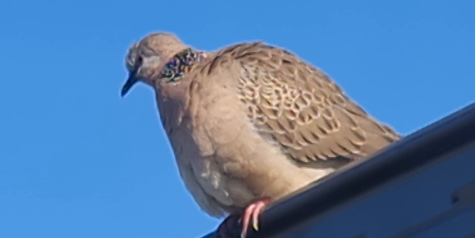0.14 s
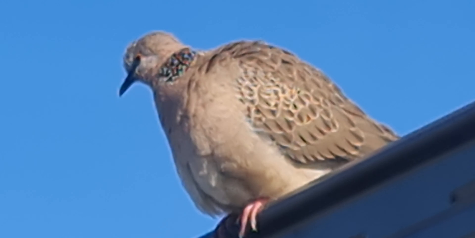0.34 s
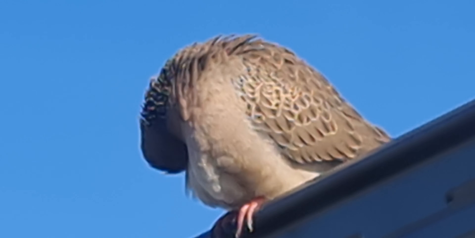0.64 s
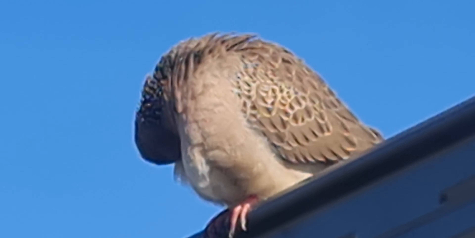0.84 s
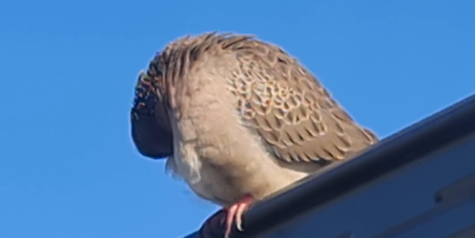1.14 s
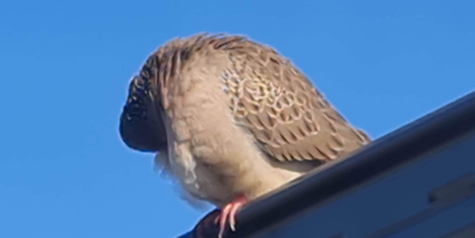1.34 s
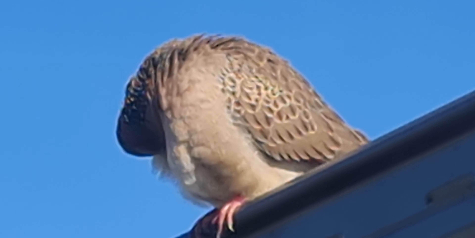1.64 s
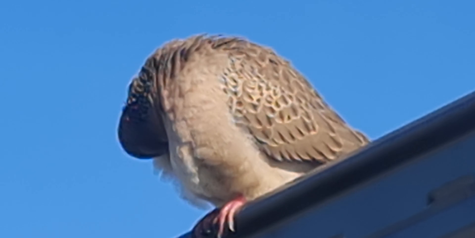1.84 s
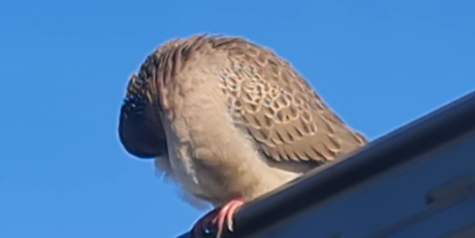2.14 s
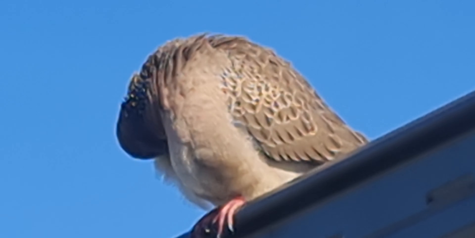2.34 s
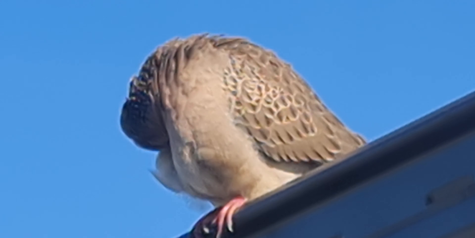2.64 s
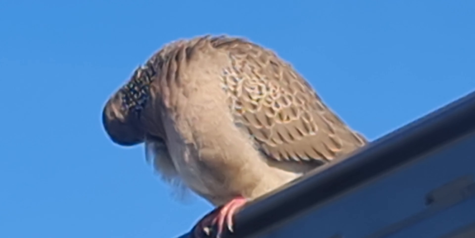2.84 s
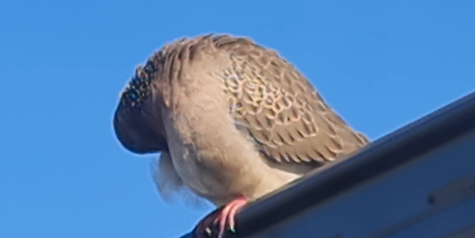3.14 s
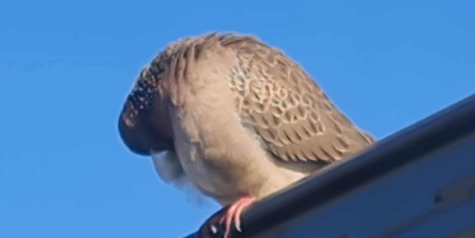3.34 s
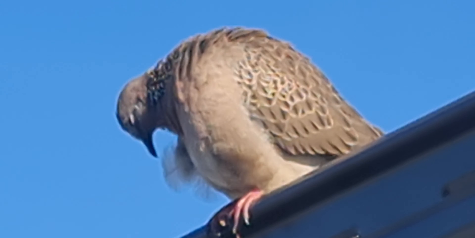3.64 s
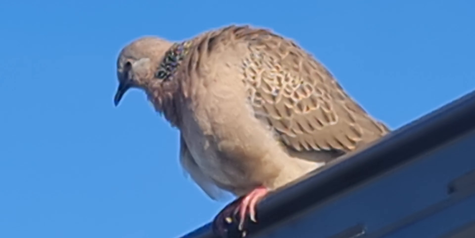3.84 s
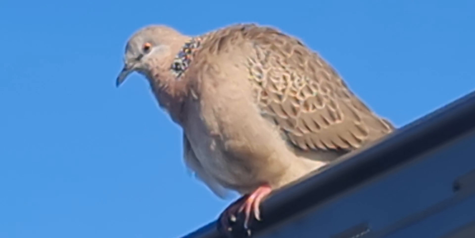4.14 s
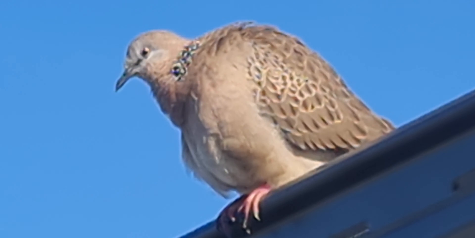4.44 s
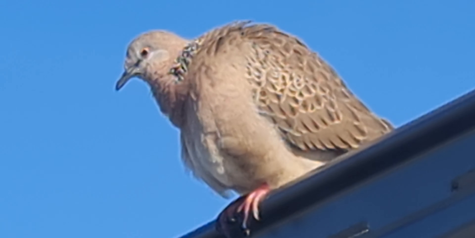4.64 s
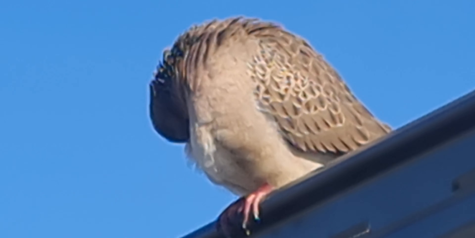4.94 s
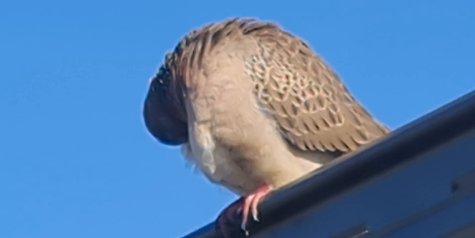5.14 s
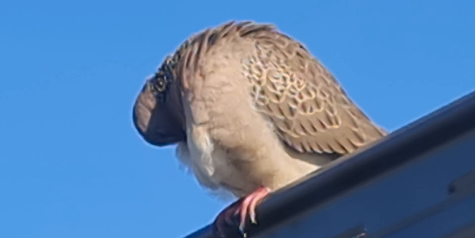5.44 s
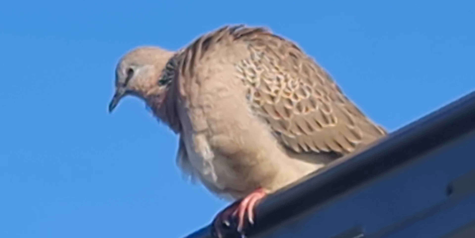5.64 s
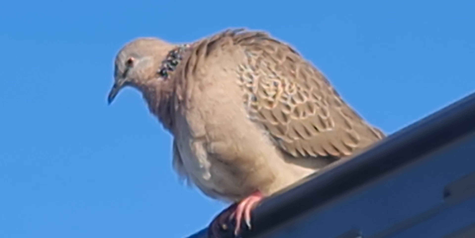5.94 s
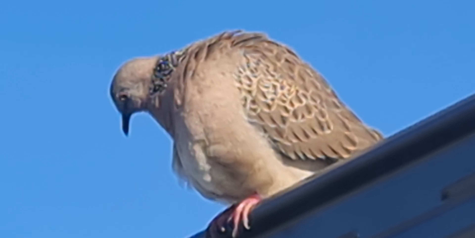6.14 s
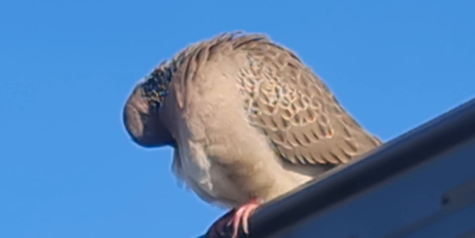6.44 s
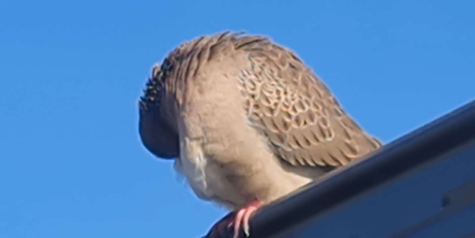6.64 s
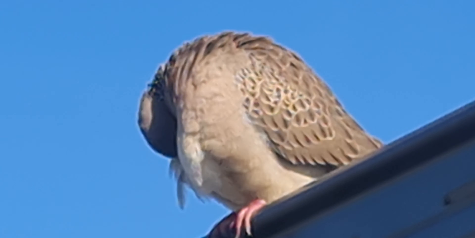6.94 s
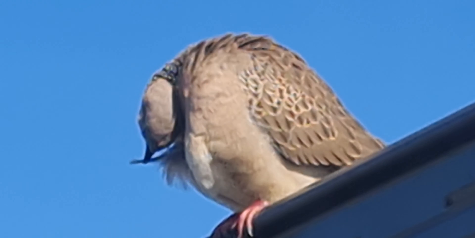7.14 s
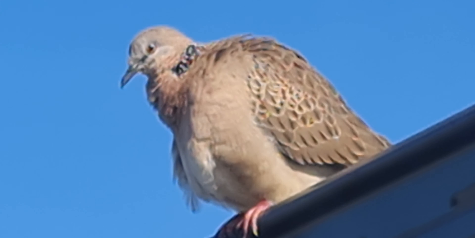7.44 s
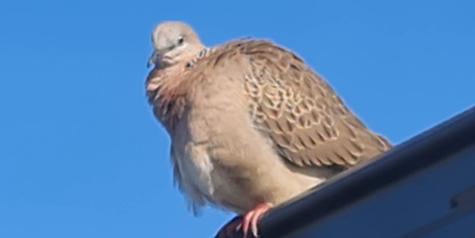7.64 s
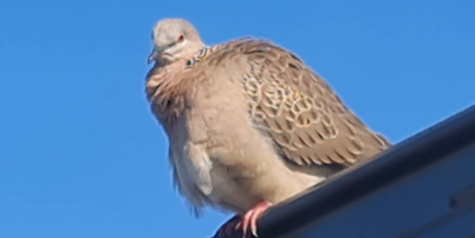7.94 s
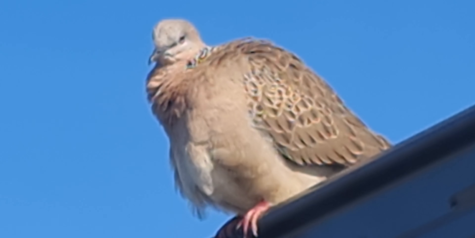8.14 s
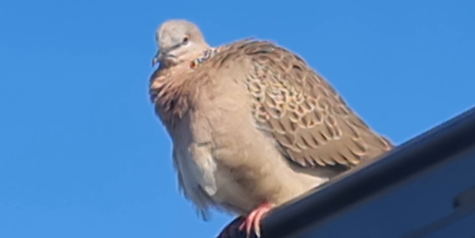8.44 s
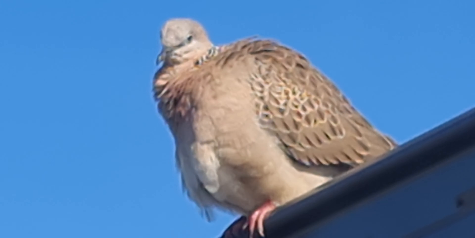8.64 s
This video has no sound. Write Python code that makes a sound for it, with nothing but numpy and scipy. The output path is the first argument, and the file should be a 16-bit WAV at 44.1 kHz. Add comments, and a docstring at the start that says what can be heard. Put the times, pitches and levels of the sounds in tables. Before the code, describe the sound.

Outdoors near a house, a dove finishes a long purring coo, then after a pause gives two full phrases: short coo, swelling coo, sinking purr. Between them small birds chip, whistle, scold harshly and fall in husky slurs; a quickening twitter follows before another phrase begins and is cut off. Dove prominent with light echo, mono, over soft hush and faint rumble.

```python
"""A spotted dove on a roof gutter is heard first at the end of a phrase, on a long purring coo.
Faint high tones sound along with it; small birds chip and whistle, and a ping and a faint hoot come next.
The next phrase runs short coo, swelling arched coo, purr: a near sine chopped by a trill, echoed by the house.
Scolds and husky falls follow, then the phrase again, a quickening twitter and the start of one more phrase.
High calls are frequency-modulated sines; shaped noise gives a far rumble and a soft hush throughout."""
import sys
import numpy as np
from scipy import signal
from scipy.fft import rfft, irfft
from scipy.io import wavfile

SR = 44100
rng = np.random.default_rng(int(sys.argv[2]) if len(sys.argv) > 2 else 0)


def wav_record(signal):
    """Record a signal, one row per channel, as 16-bit PCM in the file named by sys.argv[1]."""
    frames = np.transpose(np.atleast_2d(signal))
    bounded = np.clip(frames, -1, 1)
    # unit amplitude maps onto the largest positive 16-bit level
    quanta = np.round(bounded * 32767).astype(np.int16)
    wavfile.write(sys.argv[1], SR, quanta)


N = 387638  # length in samples

# The opening coo. Each row: start in seconds, length in seconds, pitch in Hz before scoop and sag,
# level in dB before shaping.
SHORT_COOS = [(2.807, 0.11, 641, -11.5), (5.332, 0.11, 649, -11), (8.357, 0.11, 643, -11)]
# The swelling coo. Each row: start in seconds, length in seconds, pitch the climb aims for in Hz,
# level in dB before shaping.
ARCHED_COOS = [(2.942, 0.24, 741.7, -6), (5.47, .248, 735, -5.5), (8.499, .243, 742, -5.5)]
# The long closing coo. Each row: start in seconds, length in seconds, pitch in Hz before scoop and sag,
# level in dB before shaping.
PURRING_COOS = [(0.037, .617, 706.2, -6.5), (3.33, .6, 702.8, -6), (5.855, .58, 692.8, -6)]
# Discrete reflections off roof and walls. Each row: delay in seconds, level in dB re the direct voice.
HOUSE_ECHOES = [(.0105, -19.5), (.024, -13), (.041, -17), (.075, -20.5), (.14, -26)]
GARDEN_DB, GARDEN_T60_S = -16.5, 1.15


def dove():
    """Reverberation: direct voice, early echoes off the house, then diffuse tails from garden and street."""
    voice = repeat(short_coo, SHORT_COOS)
    voice += repeat(arched_coo, ARCHED_COOS)
    voice += repeat(purring_coo, PURRING_COOS)
    out = voice + from_db(GARDEN_DB) * scatter(voice, t60=GARDEN_T60_S, delay=0.013)
    out += from_db(-26.5) * scatter(voice, t60=4.0, delay=0.19)  # the street
    for delay, echo_db in HOUSE_ECHOES:
        add(out, delay, from_db(echo_db) * voice)
    # the tail stops dead at the last tick and stays silent until the next short coo
    silent_from = int(TICKS[-1][0] * SR)
    silent_to = int(SHORT_COOS[1][0] * SR)
    out[silent_from:silent_to] = 0
    return out


SCOOP_S, COO_RELEASE_S = 0.01532, 0.015
SHORT_SCOOP_HZ, SHORT_SAG_HZ, SHORT_ATTACK_S = 228, 172, 0.022
SHORT_HOLD_S, SHORT_BREAK_S, SHORT_BREAK_DB = 0.054, 0.024, 5.5
SHORT_TRILL, SHORT_BROKEN_TRILL, SHORT_PULSES_PER_S = 0.3, 0.7, 78  # trill depths 0-1


def short_coo(length, pitch_hz):
    """Pitch glide and amplitude modulation: scoops up, holds almost clear, sags and breaks into a weak trill."""
    t, u = clock(length)
    hz = pitch_hz - SHORT_SCOOP_HZ * np.exp(-t / SCOOP_S) - SHORT_SAG_HZ * u ** 2
    broken = ramp((t - SHORT_HOLD_S) / SHORT_BREAK_S)
    gain = envelope(t, SHORT_ATTACK_S, COO_RELEASE_S) * from_db(-SHORT_BREAK_DB * broken)
    depth = SHORT_TRILL * (1 - broken) + SHORT_BROKEN_TRILL * broken
    return coo(hz, gain, depth, SHORT_PULSES_PER_S)


ARCH_FROM_HZ, ARCH_CLIMB_AT_S, ARCH_CLIMB_S = 535, 0.112, 0.015
ARCH_SWELL_S, ARCH_SWELL_DB, ARCH_DROP_HZ, ARCH_DROP_S = 0.135, 21, 280, 0.014
ARCH_TRILL, ARCH_CLEARS_AT_S, ARCH_CLEARS_S, ARCH_PULSES_PER_S = 0.8, 0.1, 0.054, 76
RESONANCE_HZ, RESONANCE_WIDTH_HZ, RESONANCE_DB = 688, 30, 4


def arched_coo(length, top_hz, release_s=0.021):
    """Resonance: a swelling trill climbs to a clear tone and collapses, flaring at each pass of a resonance."""
    t, _ = clock(length)
    effort = 1 / (1 + np.exp((ARCH_CLIMB_AT_S - t) / ARCH_CLIMB_S))
    climb_hz = ARCH_FROM_HZ + (top_hz - ARCH_FROM_HZ) * effort
    hz = climb_hz - ARCH_DROP_HZ * np.exp((t - length) / ARCH_DROP_S)
    swell_db = -ARCH_SWELL_DB * np.maximum(1 - t / ARCH_SWELL_S, 0) ** 1.24
    flare_db = RESONANCE_DB * np.exp(-((hz - RESONANCE_HZ) / RESONANCE_WIDTH_HZ) ** 2)
    gain = envelope(t, 0.005, release_s) * from_db(swell_db + flare_db)
    depth = ARCH_TRILL * (1 - ramp((t - ARCH_CLEARS_AT_S) / ARCH_CLEARS_S))
    return coo(hz, gain, depth, ARCH_PULSES_PER_S)


PURR_SCOOP_HZ, PURR_SAG_HZ, PURR_DROP_HZ, PURR_DROP_S = 215.6, 153.5, 114, 0.0097
PURR_ATTACK_S, PURR_FADE_DB = 0.055, 5.5
PURR_TRILL, PURR_CLEARS_S = 0.86, 0.29
PURR_PULSES_PER_S, PURR_QUICKENS_PER_S = 45, 18  # the quickening is scaled by the trill depth


def purring_coo(length, pitch_hz, scoop_s=0.02):
    """Amplitude modulation: a deep trill, quickest near the middle, that sinks in pitch and smooths out."""
    t, u = clock(length)
    hz = pitch_hz - PURR_SCOOP_HZ * np.exp(-t / scoop_s) - PURR_SAG_HZ * u ** 1.8
    hz -= PURR_DROP_HZ * np.exp((t - length) / PURR_DROP_S)
    gain = envelope(t, PURR_ATTACK_S, COO_RELEASE_S) * from_db(-PURR_FADE_DB * u ** 2)
    depth = PURR_TRILL * ramp((length - t) / PURR_CLEARS_S)
    rate = PURR_PULSES_PER_S + PURR_QUICKENS_PER_S * np.sin(np.pi * u) * depth
    return coo(hz, gain, depth, rate)


PULSE_FLUTTER_DB, PULSE_UNEVEN, STUMBLE = 1.5, 0.26, 0.2  # last two: spread as a fraction


def coo(hz, gain, depth, rate, sag=0.19, lift=0.067, jitter=0.017, second_db=-41, third_db=-47):
    """Flow modulation: a valve chops a near sine into pulses, and pitch sags as the flow is pinched."""
    size, depth = len(hz), np.clip(depth, 0, 1)
    cycle = turns_of(rate * (1 + PULSE_UNEVEN * wander(35, size)))
    pinch = depth * np.abs(np.sin(cycle / 2)) ** 2.5
    # the pitch climbs through each pulse, and the tone stumbles out of step between pulses
    bend = lift * depth * np.sin(cycle)
    bend -= pinch ** 2 * (sag + STUMBLE * wander(57.6, size))
    phase = turns_of(hz * (1 + bend + jitter * wander(220, size)))
    flutter = from_db(PULSE_FLUTTER_DB * depth * wander(75, size))
    flow = (1 - pinch) * gain * flutter
    # the swollen throat passes little but the fundamental
    throat = signal.butter(3, [420, 840], "band", fs=SR, output="sos")
    fundamental = signal.sosfilt(throat, flow * np.sin(phase))
    overtones = from_db(second_db) * np.sin(2 * phase) + from_db(third_db) * np.sin(3 * phase)
    return fundamental + flow * overtones


# Clear thin whistles; the first two are faint high tones heard along with the opening coo.
# Each row: start in seconds, length in seconds, first pitch in Hz, last pitch in Hz,
# level in dB before the distance mix.
WHISTLES = [(.04, .15, 4950, 5270, -53), (.29, .32, 5300, 5260, -58), (.85, 0.174, 4250, 4250, -52.5),
            (1.33, .14, 1747, 2117, -52), (1.47, 0.14, 2210, 2176, -53.5), (1.74, .1, 1826, 1727, -47.5),
            (5.6, 0.28, 2310, 1934, -54.5), (6.19, 0.13, 2105, 1935, -42.5), (6.2, 1, 2483, 2504, -51),
            (6.62, 0.078, 2186, 2120, -43), (6.73, 0.092, 2074, 1907, -44), (7.14, .25, 2062, 2130, -50),
            (7.49, 0.2, 2090, 2300, -47), (7.5, 0.46, 2827, 2607, -46.5), (8.24, 0.43, 3215, 3170, -51.5),
            (8.54, .23, 4760, 5020, -50)]
# Mellow whistles that jump up and slide down. Each row: start in seconds, length in seconds,
# level in dB before the distance mix.
DOWNSLURS = [(0.455, .43, -42.5), (1.963, .36, -43)]
# Whistles that climb. Each row: start in seconds, length in seconds, level in dB before the distance mix.
UPSLURS = [(2.376, 0.11, -33), (3.179, 0.12, -33), (3.86, 0.14, -31.5)]
# Harsh scolding calls. Each row: start in seconds, length in seconds, first pitch in Hz,
# last pitch in Hz, level in dB before the distance mix.
SCOLDS = [(4.065, 0.083, 4800, 5170, -46), (4.11, 0.34, 3310, 3317, -38), (4.37, .26, 3380, 3400, -37.5),
          (5.95, 0.38, 3960, 3857, -50.5), (7.64, .2, 3286, 3110, -40), (7.92, 0.24, 6220, 6100, -50),
          (7.97, 0.17, 3450, 3800, -42.5), (8.2, 0.39, 3703, 3554, -42), (8.5, 0.28, 5670, 5600, -51.5)]
# Husky falling calls. Each row: start in seconds, length in seconds, first pitch in Hz,
# last pitch in Hz, level in dB before the distance mix.
FALLS = [(4.55, .18, 3946, 2766, -34.5), (4.88, .32, 5030, 2720, -36)]
WHISTLE_RASP, SCOLD_RASP = 0.16, 0.94  # 0-1


def small_birds():
    """Direct-to-reverberant ratio: close chips are mostly direct; near and far calls carry more scattered
    sound, near with the longer tail."""
    close = chips()
    near = glides(SCOLDS, SCOLD_RASP, quiver_db=3.0)
    near += glides(FALLS, rasp=0.73, quiver_db=2.5)
    near += twitters()
    far = glides(WHISTLES, WHISTLE_RASP)
    far += repeat(downslur, DOWNSLURS)
    far += repeat(upslur, UPSLURS)
    out = close + from_db(-1.5) * scatter(close, t60=0.48, delay=0.0062)
    out += from_db(-1.5) * near + scatter(near, t60=1.0, delay=0.0048)
    out += from_db(-2.5) * far + from_db(-1.0) * scatter(far, t60=0.78, delay=0.005)
    return out


# The notes of one chip. Each row: delay from the chip's onset in seconds, length in seconds,
# first pitch in Hz, last pitch in Hz, level in dB before the chip's own level is added, rasp 0-1.
CHIP_NOTES = [(-.025, .028, 4500, 6360, -38.5, 0.9), (0, .044, 4170, 3710, -26.5, 0.2),
              (0.044, .022, 2970, 3800, -29.5, 0.18), (0.06, .04, 3750, 2603, -34.5, .3)]
# When chips sound. Each row: onset in seconds, level in dB added to every note.
CHIPS = [(.67, 2), (1.594, -6.5)]


def chips():
    """Frequency modulation: a very harsh upstroke, two clearer notes and a slightly rough fall."""
    out = np.zeros(N)
    for delay, length, first_hz, last_hz, note_db, rasp in CHIP_NOTES:
        calls = [(s + delay, length, first_hz, last_hz, db + note_db) for s, db in CHIPS]
        out += glides(calls, rasp, quiver_db=-1.0, overtone_db=-28.5)
    return out


TWITTER_FROM_S, TWITTER_GAP_S, TWITTER_QUICKENS_S, TWITTER_LENGTH_S = 6.33, 0.107, 0.00051, 0.045
TWITTER_LOW_HZ, TWITTER_HIGH_HZ, TWITTER_DB, TWITTER_GROWS_DB = 3296, 4050, -49, 0.5


def twitters(count=12):
    """Accelerating rhythm: short upward flicks, each a little sooner and louder than the last."""
    calls = []
    for k in range(count):
        start = TWITTER_FROM_S + k * (TWITTER_GAP_S - k * TWITTER_QUICKENS_S)
        level_db = TWITTER_DB + k * TWITTER_GROWS_DB
        calls.append((start, TWITTER_LENGTH_S, TWITTER_LOW_HZ, TWITTER_HIGH_HZ, level_db))
    return glides(calls, rasp=0.6)


UPSLUR_LOW_HZ, UPSLUR_HIGH_HZ, UPSLUR_EDGE_DB, UPSLUR_RASP = 2920, 4370, 13.5, 0.13


def upslur(length):
    """Frequency sweep: a quickening climb in pitch, loudest past the middle."""
    u = clock(length)[1] ** 1.4
    hz = UPSLUR_LOW_HZ + (UPSLUR_HIGH_HZ - UPSLUR_LOW_HZ) * u
    return whistle(hz, from_db(-UPSLUR_EDGE_DB * np.abs(2 * u - 1)), UPSLUR_RASP)


DOWNSLUR_HZ, DOWNSLUR_JUMP_HZ, DOWNSLUR_JUMP_S = 3170, 1104, 0.045
DOWNSLUR_SLIDE_HZ, DOWNSLUR_RASP = 1121, 0.22


def downslur(length):
    """Frequency sweep: a quick exponential jump in pitch and a long linear slide down."""
    t, u = clock(length)
    hz = DOWNSLUR_HZ - DOWNSLUR_JUMP_HZ * np.exp(-t / DOWNSLUR_JUMP_S) - DOWNSLUR_SLIDE_HZ * u
    return whistle(hz, envelope(t, attack_s=0.032, release_s=0.031), DOWNSLUR_RASP)


def glides(calls, rasp, quiver_db=5.0, overtone_db=-36):
    """Glissando: calls swell and fade, quivering in level, while pitch slides by equal ratios."""
    out = np.zeros(N)
    for start, length, first_hz, last_hz, level_db in calls:
        _, u = clock(length)
        hz = first_hz * (last_hz / first_hz) ** u
        swell = np.sqrt(np.abs(np.sin(np.pi * u)))
        gain = swell * from_db(level_db + quiver_db * wander(50, len(u)))
        add(out, start, whistle(hz, gain, rasp, overtone_db=overtone_db))
    return out


def whistle(hz, gain, rasp, spread=0.131, rasp_hz=600, overtone_db=-36):
    """Frequency modulation: fast irregular swings of pitch make a tone harsh."""
    phase = turns_of(hz * (1 + spread * rasp * wander(rasp_hz, len(hz))))
    return gain * (np.sin(phase) + from_db(overtone_db) * np.sin(2 * phase))


# Partials of the bell-like ping. Each row: settled frequency in Hz, level in dB re PING_DB,
# decay time T60 in seconds.
PING_MODES = [(5070, -26, 0.57), (5147, 1.5, 0.26), (5290, -16.5, 0.4)]
PING_S, PING_DB, PING_HOLD_S = 2.378, -27, 0.031  # each partial holds before it dies
PING_BEND_HZ, PING_SETTLE_S = 218, 0.018  # it starts sharp and settles


def ping(shimmer=0.0086):
    """Modal decay: close partials start at once, settle in pitch and die away among the trees."""
    out = np.zeros(N)
    t, _ = clock(1)
    for hz, level_db, t60 in PING_MODES:
        pitch = hz * (1 + shimmer * wander(150, len(t))) + PING_BEND_HZ * np.exp(-t / PING_SETTLE_S)
        decay_db = -60 * np.maximum(t - PING_HOLD_S, 0) / t60
        add(out, PING_S, from_db(PING_DB + level_db + decay_db) * np.sin(turns_of(pitch)))
    return out + from_db(-10.5) * scatter(out, t60=1.0, delay=0.015)


HOOT_S, HOOT_LENGTH_S, HOOT_HZ, HOOT_DB = 2.46, 0.62, 319, -42.5


def hoot():
    """Steady tone: one faint low hoot far away, its pitch slightly unsteady."""
    out = np.zeros(N)
    t, _ = clock(HOOT_LENGTH_S)
    gain = from_db(HOOT_DB) * envelope(t, attack_s=0.051, release_s=0.053)
    add(out, HOOT_S, whistle(np.full(len(t), HOOT_HZ), gain, rasp=0.16))
    return out


# Faint dry ticks. Each row: start in seconds, level in dB.
TICKS = [(2.378, -32), (4.07, -31)]


def ticks(decay_s=0.00038):
    """Impulse: a burst of noise under a very short exponential decay."""
    out = np.zeros(N)
    t, _ = clock(1)
    for start, level_db in TICKS:
        add(out, start, from_db(level_db) * rng.standard_normal(SR) * np.exp(-t / decay_s))
    return out


# Spectrum of the low rumble. Each row: frequency in Hz, relative density in dB per Hz.
RUMBLE = [(12, -39), (20, -9), (60, -3), (73, 5), (88, -2), (125, -4), (150, -3), (182, -11.5), (216, -8),
          (274, -18.5), (300, -13.5), (390, -46), (660, -120)]
# Course of the rumble. Each row: time in seconds, level in dB before RUMBLE_DB is added.
RUMBLE_LEVEL = [(0.0, -39.5), (0.49, -42.5), (0.54, -37), (0.95, -44), (3.35, -40.5), (3.97, -34),
                (4.13, -46), (5.24, -46.5), (5.29, -40), (7.83, -46), (8.27, -39.5), (8.79, -40)]
# Spectrum of the outdoor hush. Each row: frequency in Hz, relative density in dB per Hz.
HUSH = [(150, -10), (280, -3), (450, -3), (700, 0), (950, 2), (1300, -7), (1800, -15), (2600, -19),
        (3700, -20), (5000, -24.5), (6500, -28), (8500, -32.5), (10500, -33), (11200, -47.5)]
# Course of the hush. Each row: time in seconds, level in dB before HUSH_DB is added.
HUSH_LEVEL = [(0.0, -42), (1.08, -44.5), (1.49, -43.5), (3.84, -44.5), (4.21, -45.5), (8.49, -44.5),
              (8.79, -41)]
RUMBLE_DB, HUSH_DB = 1.5, 5


def background():
    """Stationary noise with varying gain: low rumble and outdoor hush, with the hoot and ticks added."""
    t = np.arange(N) / SR
    rumble_db = np.interp(t, *np.transpose(RUMBLE_LEVEL)) + RUMBLE_DB
    hush_db = np.interp(t, *np.transpose(HUSH_LEVEL)) + HUSH_DB
    out = from_db(rumble_db) * coloured_noise(RUMBLE)
    out += from_db(hush_db) * coloured_noise(HUSH)
    return out + hoot() + ticks()


def coloured_noise(spectrum):
    """Spectral shaping: white noise weighted along a log frequency axis, then scaled to rms 1."""
    hz, db = np.transpose(spectrum)
    bins = np.maximum(np.fft.rfftfreq(N, 1 / SR), 1)
    gain = from_db(np.interp(np.log(bins), np.log(hz), db))
    return rms_one(irfft(rfft(rng.standard_normal(N)) * gain, N))


def scatter(x, t60, delay):
    """Diffuse reverberation: decaying noise of unit energy stands for echoes from walls and foliage."""
    t = np.arange(2 * SR) / SR
    onset = np.clip(t / delay - 1, 0, 1)
    response = rng.standard_normal(len(t)) * from_db(-60 * t / t60) * onset
    return signal.fftconvolve(x, response / np.linalg.norm(response))[:N]


def repeat(voice, events):
    """Superposition: one syllable per row, onset first, level last, its own settings between."""
    out = np.zeros(N)
    for start, *settings, level_db in events:
        add(out, start, from_db(level_db) * voice(*settings))
    return out


def add(out, start, sound):
    """Superposition: mix a sound in at a time in seconds."""
    at = int(np.clip(round(start * SR), 0, N - 1))
    out[at:at + len(sound)] += sound[:N - at]


def wander(rate_hz, size):
    """Low-pass random process: a smooth curve of rms 1, looped if the sound outlasts it."""
    smooth = signal.butter(2, rate_hz, fs=SR, output="sos")
    slow = signal.sosfilt(smooth, rng.standard_normal(2 * SR))
    return np.resize(rms_one(slow[SR // 2:]), size)


def turns_of(hz):
    """Phase as the integral of frequency, in radians."""
    return 2 * np.pi * np.cumsum(hz) / SR


def clock(length):
    """Time base: time from the onset in s, and the share of the length gone by."""
    t = np.arange(int(length * SR)) / SR
    return t, t / length


def ramp(x):
    """Raised-cosine step from 0 to 1 as x goes from 0 to 1."""
    return np.sin(np.pi / 2 * np.clip(x, 0, 1)) ** 2


def envelope(t, attack_s, release_s):
    """Amplitude envelope: attack, hold, release."""
    return np.sqrt(ramp(t / attack_s)) * ramp((t[-1] - t) / release_s)


def from_db(db):
    """Decibel law: amplitude ratio for a level in dB."""
    return 10 ** (np.asarray(db) / 20)


def rms_one(x):
    """Normalization to unit mean square."""
    return x / np.sqrt(np.mean(x ** 2) + 1e-20)


def steep(x, hz, kind):
    """Elliptic filtering: a steep low-pass or high-pass."""
    return signal.sosfilt(signal.ellip(10, 0.2, 70, hz, kind, fs=SR, output="sos"), x)


def scene():
    """Superposition of dove, small birds, ping and background in one channel."""
    return (dove() + small_birds() + ping() + background())[None]


DULL_ABOVE_HZ, DULL_DB, CUTOFF_HZ = 8700, -11, 15700


def record(dry):
    """Band limiting: the high treble is dulled and the top is cut steeply."""
    treble = steep(dry, DULL_ABOVE_HZ, "high")
    dulled = steep(dry, DULL_ABOVE_HZ, "low") + from_db(DULL_DB) * treble
    return steep(dulled, CUTOFF_HZ, "low")


dry = scene()
out = record(dry)
wav_record(out)
```